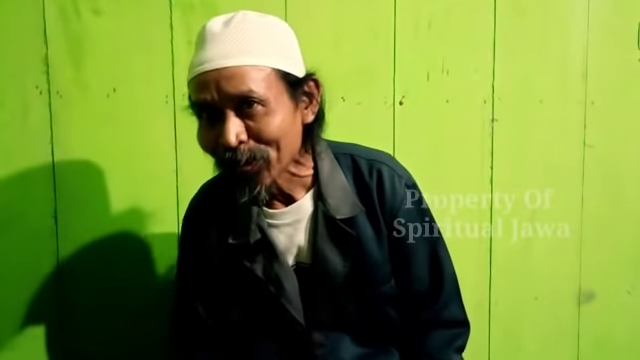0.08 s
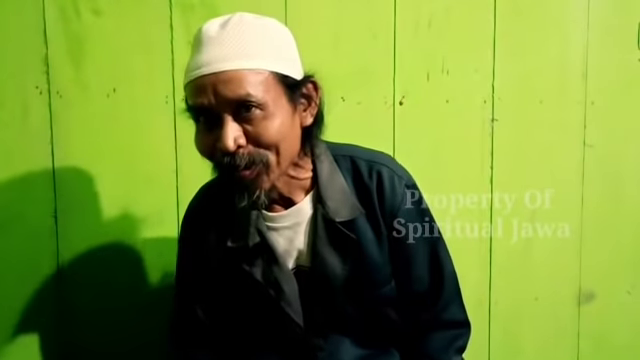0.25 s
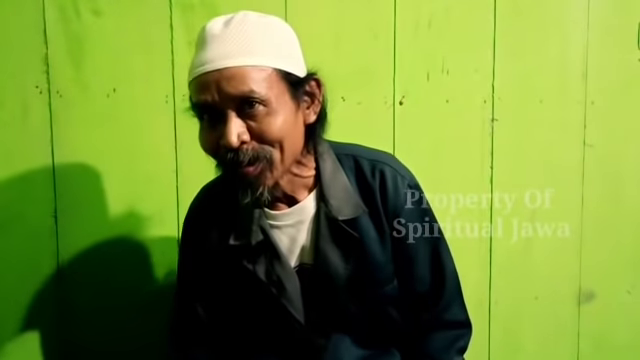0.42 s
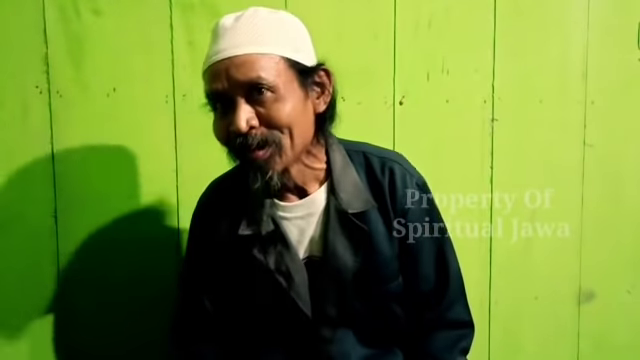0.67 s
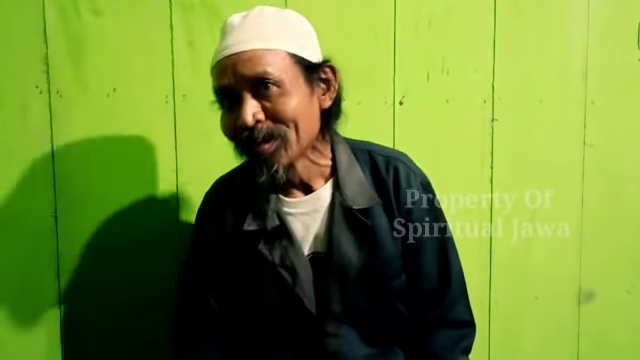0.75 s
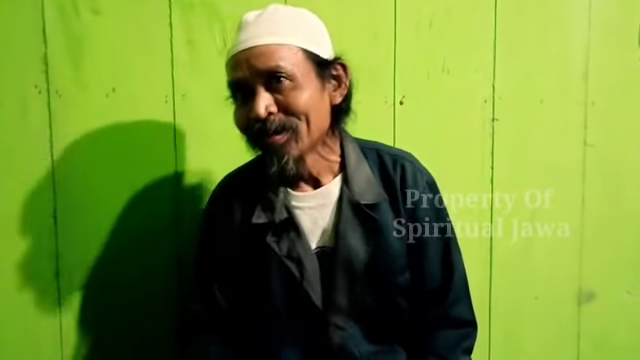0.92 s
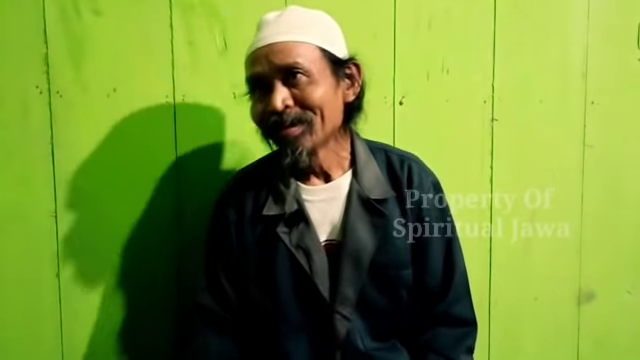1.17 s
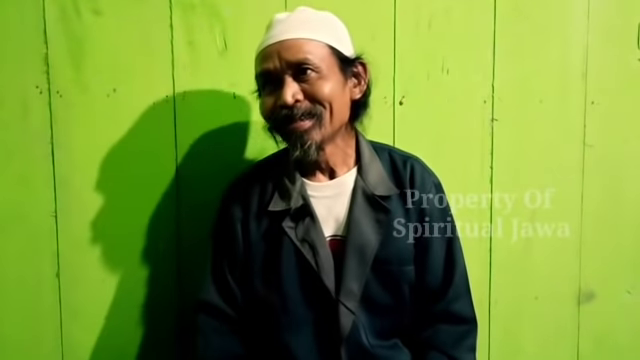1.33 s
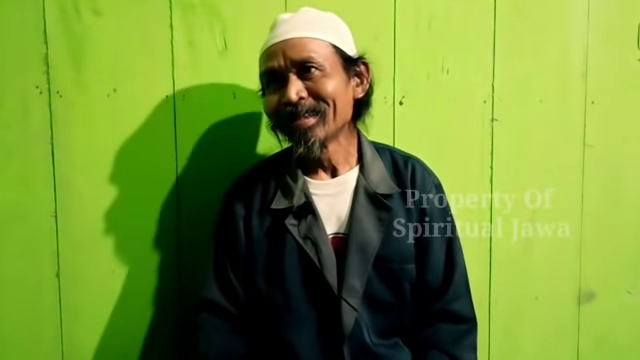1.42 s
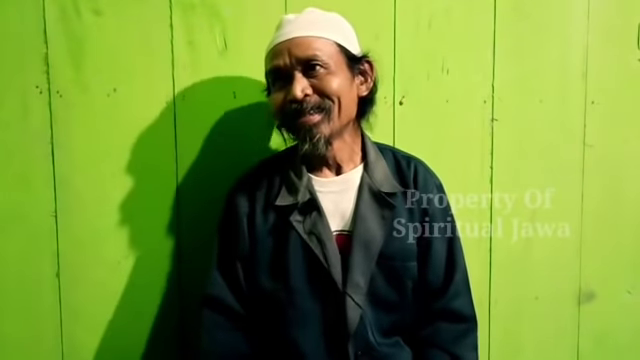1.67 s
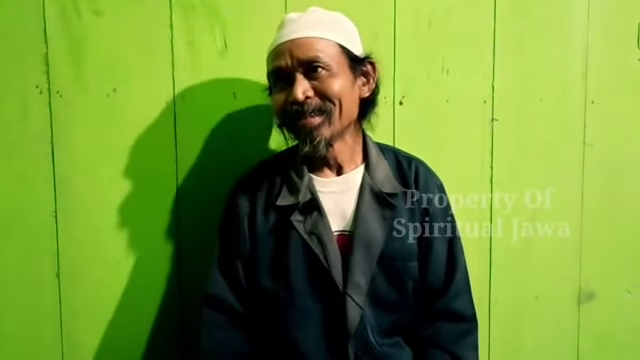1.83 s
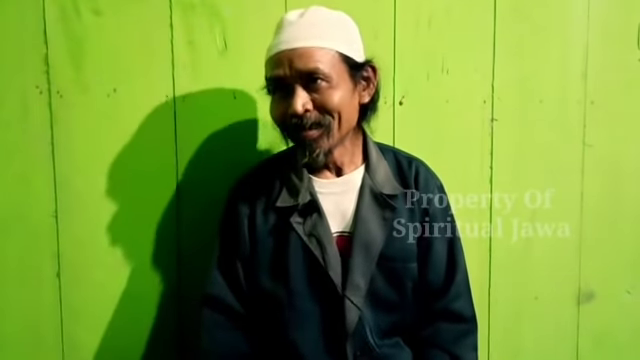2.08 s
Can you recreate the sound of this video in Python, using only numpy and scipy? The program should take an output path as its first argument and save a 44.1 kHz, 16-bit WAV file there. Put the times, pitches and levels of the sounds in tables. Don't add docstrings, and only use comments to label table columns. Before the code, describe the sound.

A dove coos four soft phrases, with a rolled trill, across an echoing plank-walled yard

```python
import sys
import numpy as np
from scipy import signal
from scipy.fft import rfft, irfft
from scipy.io import wavfile
from scipy.ndimage import uniform_filter1d

SR = 44100
rng = np.random.default_rng(int(sys.argv[2]) if len(sys.argv) > 2 else 0)


def log_audio(samples):
    frames = np.atleast_2d(samples).T
    limited = np.clip(frames, -1, 1)
    pcm = np.round(limited * 32767).astype(np.int16)
    wavfile.write(sys.argv[1], SR, pcm)


def gain_from_db(level_db):
    decades = np.asarray(level_db, float) / 20
    return 10 ** decades


N = 92521

# time in seconds, pitch in Hz, level in dB.
HOOT = [(.088, 598.4, -54), (.1, 615, -34.5), (.118, 639.8, -28.5), (.135, 550, -49), (.15, 635, -71)]
# time in seconds, pitch in Hz, level in dB.
GULP = [(0.104, 318, -76.5), (0.124, 309, -54.5), (0.154, 267, -59.5), (.175, 282, -82.5)]
# time in seconds, pitch in Hz, level in dB.
RISE_FALL = [(.372, 520, -59.5), (0.387, 624, -41.5), (.41, 755, -34), (.422, 806, -30),
             (0.448, 804.3, -40.5), (.478, 797, -43.5), (.49, 726, -82)]
# time in seconds, pitch in Hz, level in dB.
HOLD_DROP = [(0.478, 793.6, -39.5), (0.503, 781, -24), (0.521, 782, -29), (0.533, 782.3, -48),
             (.55, 773.7, -25.5), (0.573, 767, -33), (0.606, 740, -30.5), (0.612, 671, -25.5),
             (0.632, 430, -47)]
# start in seconds, length in seconds, from Hz, to Hz, level in dB.
TRILL = [
    (0.817, .028, 587.4, 611, -33),
    (0.847, 0.038, 590, 903, -32),
    (0.888, 0.039, 590, 884, -31),
    (.932, 0.0393, 580, 883.4, -30.5),
    (0.967, .036, 590, 867, -35),
    (1.005, 0.032, 585, 900, -32),
    (1.03, 0.021, 577.6, 688, -37),
]
# time in seconds, pitch in Hz, level in dB.
LONG_FALL = [(1.031, 805, -61), (1.052, 793.6, -29.5), (1.122, 755.3, -32), (1.169, 701.8, -26.5),
             (1.206, 608.8, -28), (1.252, 603.5, -24), (1.326, 590.5, -50), (1.403, 596.3, -40.5),
             (1.428, 585, -81)]
# time in seconds, pitch in Hz, level in dB.
ARCH_RISE = [(1.583, 416, -59), (1.598, 450.5, -53.5), (1.614, 555.7, -37), (1.625, 634.3, -27.5),
             (1.647, 612, -34.5), (1.684, 622, -42.5), (1.705, 613.8, -45.5), (1.74, 636, -35),
             (1.771, 635, -52)]
# time in seconds, pitch in Hz, level in dB.
ARCH = [(1.626, 690, -30), (1.64, 739.6, -39.5), (1.666, 744.2, -28), (1.697, 733.8, -26.5),
        (1.734, 724.2, -32), (1.761, 700.6, -25), (1.791, 624, -30), (1.825, 573.7, -31),
        (1.865, 508.5, -48.5)]
# delay in seconds, left level in dB, right level in dB.
ECHOES = [(.0005, 6.5, 3), (.004, -20.5, -7.5), (.009, -16.5, -10.5), (.015, -10, -20.5), (.021, 0, 0),
          (.029, -17, -24), (.038, -1.5, -3.5), (.051, -18.5, -4), (.063, -12, -20), (.077, -9, -6.5),
          (.095, -21.5, -13), (.116, -13, -5.5), (.135, -11, -21), (.155, -12, -21), (.178, -19, -12),
          (.2, -16.5, -23), (.23, -23.5, -24.5), (.262, -33.5, -24), (.3, -23.5, -30)]
# pitch in Hz, width in Hz, share removed (0 to 1).
SWALLOWED = [(597, 30, .9), (780, 35, .5)]
# time in seconds, peak in dB, left minus right in dB.
TICKS = [
    (.1186, -44, 4),
    (.4095, -44, 3.5),
    (.7417, -40, 4.5),
    (1.4097, -49, 0),
    (1.6312, -49, -1),
]
# middle in seconds, length in seconds, centre in Hz, width in Hz, level in dB.
RUSTLES = [
    (.885, .15, 7000, 3500, -61),
    (.88, .12, 13000, 5000, -69),
    (.92, .2, 2200, 1800, -68),
    (1.64, .04, 12500, 6000, -64),
    (1.64, .05, 6500, 4000, -69),
    (1.84, .04, 6000, 6000, -70),
]
# frequency in Hz, density in dB per Hz.
AIR = [(25, -38.5), (62, -5), (130, 1.5), (330, -6.5), (520, -10.5), (860, -13), (1300, -18), (3200, -22.5)]
# one edge in Hz, other edge in Hz, level in dB.
HISS = [
    (3070, 20700, -62),
    (3350, 3964, -66),
    (4140, 4900, -68.5),
    (6060, 7560, -69),
    (13800, 3200, -77.5),
]
# frequency in Hz, threshold against neighbours in dB.
DROPPED = [(800, -60), (1200, -18), (2200, -11), (3000, -9.5), (4000, -14), (5200, -8.5), (8000, -10.5),
           (11700, -8), (14500, -10.5), (15300, -7), (15750, -5)]

OCTAVE_DB, TWELFTH_DB = -31, -60
THROAT_HZ, THROAT_WIDTH_HZ = 1615, 80
WOBBLE = .004
EDGE_S = .006
CHIRP_BEND = 0.73
YARD_T60_S, YARD_DB, YARD_BUILD_S = 0.75, -2.5, 0.0043
PORT_LAG_S = .00038
SWALLOWED_AFTER_S = .07
TICK_S, TICK_HZ, TICK_WIDTH_HZ, TICK_LOW_HZ = .0013, 9500, 16000, 3300
AIR_DB = -54
HUM_HZ, HUM_WIDTH_HZ, HUM_DB = 210.4, 2.8, -64.5
HISS_EDGE_HZ, HISS_FADE_DB_PER_S = 45, -1.44
FLOOR_PAN_DB = 1.5
ALIKE_HZ, ALIKE_MOST = 250, 0.66
HOP, GRID = 1024, 280
GAP_LOW_HZ, GAP_HIGH_HZ, GAP_DB, GAP_SHARE = 8650, 11600, -4, .11
TOP_HZ, TOP_OPENS_DB = 15580, 9


def level(x, db):
    return x * gain_from_db(db) / np.sqrt(np.mean(x ** 2))


def walk(rate):
    k = int(SR / rate)
    steps = np.repeat(rng.standard_normal(N // k + 1), k)
    w = uniform_filter1d(uniform_filter1d(steps, k), k)[:N]
    return w / np.std(w)


def bell(centre_hz, width_hz):
    return lambda hz: np.exp(-2 * ((hz - centre_hz) / width_hz) ** 2)


def noise(gain):
    hz = np.arange(N // 2 + 1) * SR / N + 1
    shared, left, right = rfft(rng.standard_normal((3, N)))
    alike = ALIKE_MOST / (1 + hz / ALIKE_HZ)
    both = np.sqrt(alike) * shared + np.sqrt(1 - alike) * np.array([left, right])
    return irfft(both * gain(hz), N)


def voice(hz, gain):
    phase = 2 * np.pi * np.cumsum(hz) / SR
    octave = gain_from_db(OCTAVE_DB) * bell(THROAT_HZ, THROAT_WIDTH_HZ)(2 * hz)
    tone = np.sin(phase) + octave * np.sin(2 * phase) + gain_from_db(TWELFTH_DB) * np.sin(3 * phase)
    return np.sqrt(2) * gain * tone


def dove(t):
    out = 0
    wobble = 1 + WOBBLE * walk(30.05)
    for coo in (HOOT, RISE_FALL, HOLD_DROP, LONG_FALL, ARCH_RISE, ARCH, GULP):
        s, hz, db = np.array(coo).T
        edges = np.clip(np.minimum(t - s[0], s[-1] - t) / EDGE_S, 0, 1)
        gain = gain_from_db(uniform_filter1d(np.interp(t, s, db), size=200)) * edges
        pitch = uniform_filter1d(np.interp(t, s, hz), size=300)
        out = out + voice(pitch * wobble, gain)
    for s, length, from_hz, to_hz, db in TRILL:
        u = np.clip((t - s) / length, 0, 1)
        pitch = from_hz + (to_hz - from_hz) * u ** CHIRP_BEND
        out = out + voice(pitch, gain_from_db(db) * np.sin(np.pi * u))
    return out


def yard(t):
    envelope = gain_from_db(-60 * t / YARD_T60_S) * (1 - np.exp(-t / YARD_BUILD_S))
    response = rng.standard_normal((2, N)) * envelope
    response = response / np.sqrt(np.sum(response ** 2) / 2) * gain_from_db(YARD_DB)
    for s, left_db, right_db in ECHOES:
        response[0] += gain_from_db(left_db) * np.sinc((t - s - PORT_LAG_S) * SR - 8)
        response[1] += gain_from_db(right_db) * np.sinc((t - s) * SR - 8)
    for hz, width_hz, share in SWALLOWED:
        b, a = signal.iirpeak(hz, hz / width_hz, SR)
        response = response - share * signal.lfilter(b, a, response * (t > SWALLOWED_AFTER_S))
    return response / 2


def ticks(t):
    out = 0
    snap = level(noise(lambda hz: bell(TICK_HZ, TICK_WIDTH_HZ)(hz) * (hz > TICK_LOW_HZ)), 0)
    for s, db, pan_db in TICKS:
        gain = gain_from_db(db + np.array([[pan_db], [-pan_db]]) / 2)
        out = out + snap * gain * (t > s) * np.exp(-np.abs(t - s) / TICK_S)
    return out


def rustles(t):
    out = 0
    for s, length, hz, width_hz, db in RUSTLES:
        swell = np.exp(-2 * ((t - s) / length * 2) ** 2)
        out = out + level(noise(bell(hz, width_hz)), db) * swell * gain_from_db(1.5 * walk(90))
    return out


def rumble_and_hum():
    f, d = np.array(AIR).T
    rumble = noise(lambda hz: gain_from_db(np.interp(np.log(hz), np.log(f), d)) * (hz > f[0]) * (hz < f[-1]))
    return level(rumble, AIR_DB) + level(noise(bell(HUM_HZ, HUM_WIDTH_HZ)), HUM_DB)


def hiss():
    out = 0
    swell = .4 * walk(3) + HISS_FADE_DB_PER_S * (np.arange(N) - N / 2) / SR
    for lo_hz, hi_hz, db in HISS:
        band = noise(lambda hz: np.tanh((hz - lo_hz) / HISS_EDGE_HZ) - np.tanh((hz - hi_hz) / HISS_EDGE_HZ))
        out = out + level(band, db) * gain_from_db(swell + 1.1 * walk(23))
    return out


def scene():
    t = np.arange(N) / SR
    bird = signal.fftconvolve(dove(t)[None], yard(t), axes=1)[:, :N]
    under = ticks(t) + rustles(t) + rumble_and_hum() + hiss()
    return bird * gain_from_db(4.5) + under * gain_from_db(np.array([[FLOOR_PAN_DB], [-FLOOR_PAN_DB]]) / 2)


def thin_spectrum(x):
    n, k = np.arange(2 * HOP) + .5, np.arange(HOP) + .5
    window = np.sin(np.pi * n / (2 * HOP))[:, None]
    basis = window * np.cos(np.pi / HOP * np.outer(n + HOP / 2, k)) * np.sqrt(2 / HOP)
    padded = np.pad(x, ((0, 0), (2 * HOP - GRID, 2 * HOP + (GRID - N) % HOP)))
    blocks = padded.reshape(2, -1, HOP)
    lines = np.concatenate([blocks[:, :-1], blocks[:, 1:]], axis=2) @ basis
    hz = k * SR / (2 * HOP)
    f, db = np.array(DROPPED).T
    power = uniform_filter1d(uniform_filter1d(lines ** 2, size=24, axis=2), size=3, axis=1)
    around = np.sqrt(np.abs(power))
    lines = lines * (np.abs(lines[0]) > around[0] * gain_from_db(np.interp(hz, f, db)))
    flecks = np.repeat(rng.random((len(lines[0]), HOP // 2)), 2, axis=1) < GAP_SHARE
    opens = around[0] > gain_from_db(TOP_OPENS_DB) * np.median(around[0], axis=0)
    in_gap = (hz > GAP_LOW_HZ) & (hz < GAP_HIGH_HZ)
    lines = lines * np.where(in_gap, flecks * gain_from_db(GAP_DB), (hz < TOP_HZ) | opens)
    frames = lines @ basis.T
    joined = (frames[:, :-1, HOP:] + frames[:, 1:, :HOP]).reshape(2, -1)
    return joined[:, HOP - GRID:][:, :N]


def low_pass(x):
    return signal.sosfilt(signal.butter(12, 16430, fs=SR, output="sos"), x)


def record(dry):
    mix = thin_spectrum(dry)
    return low_pass(mix)


dry = scene()
out = record(dry)
log_audio(out)
```